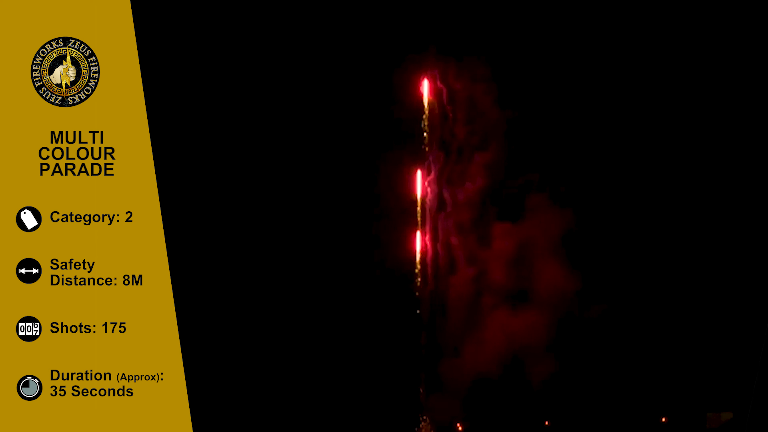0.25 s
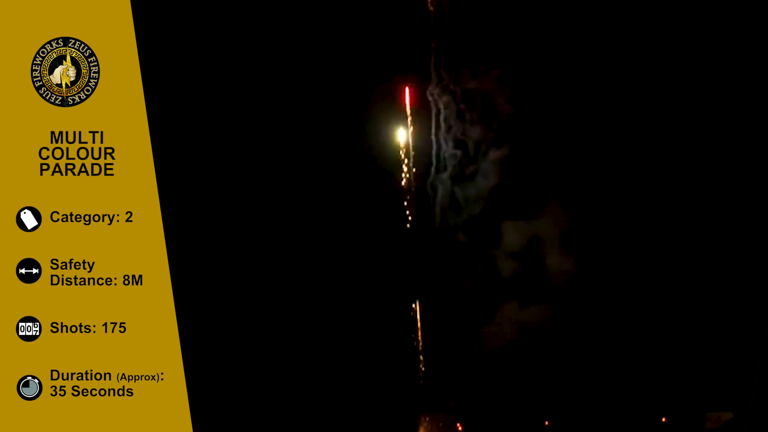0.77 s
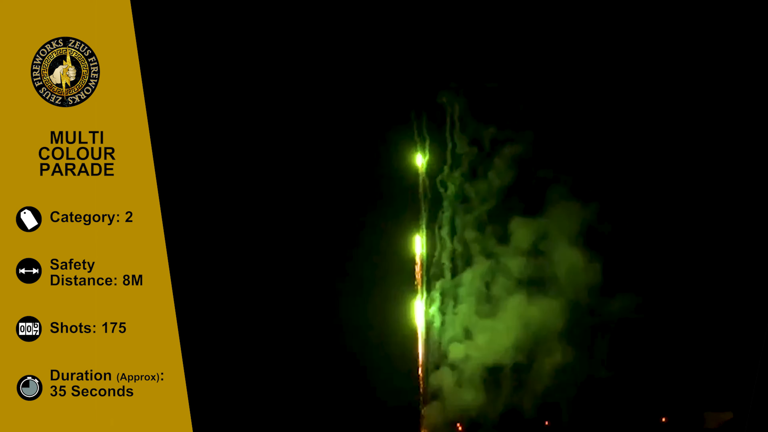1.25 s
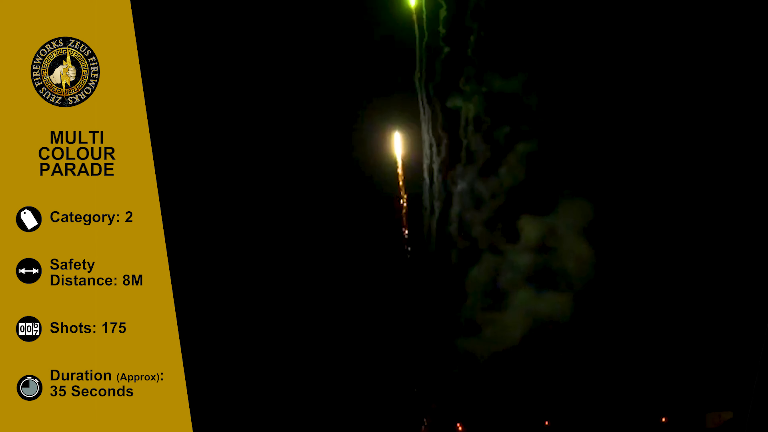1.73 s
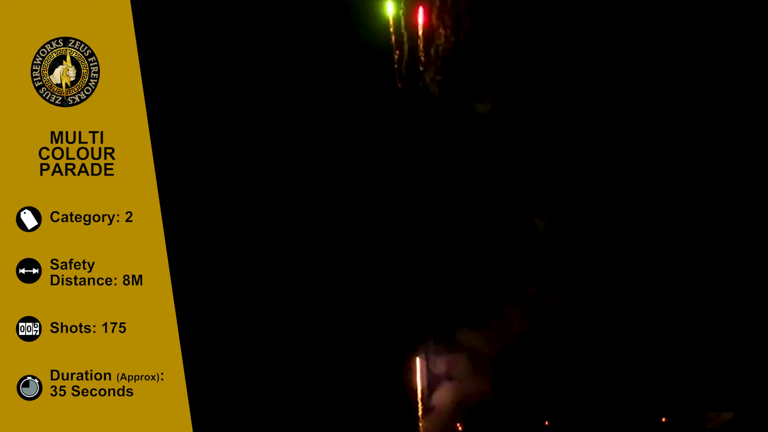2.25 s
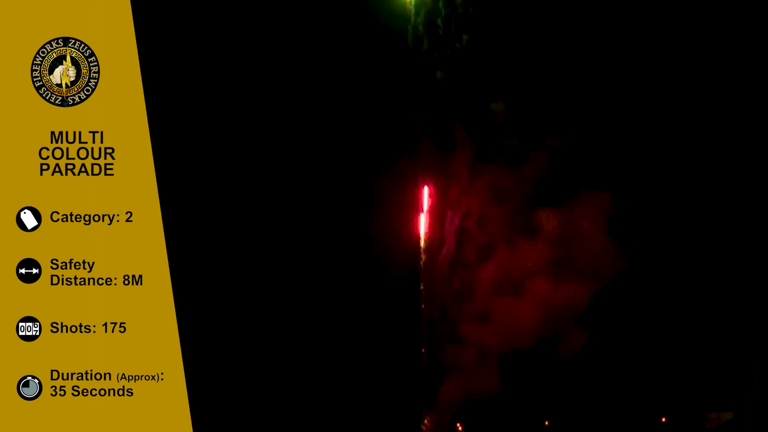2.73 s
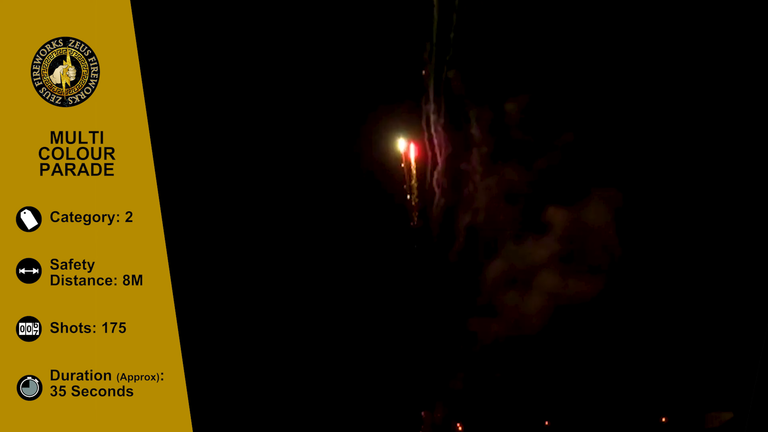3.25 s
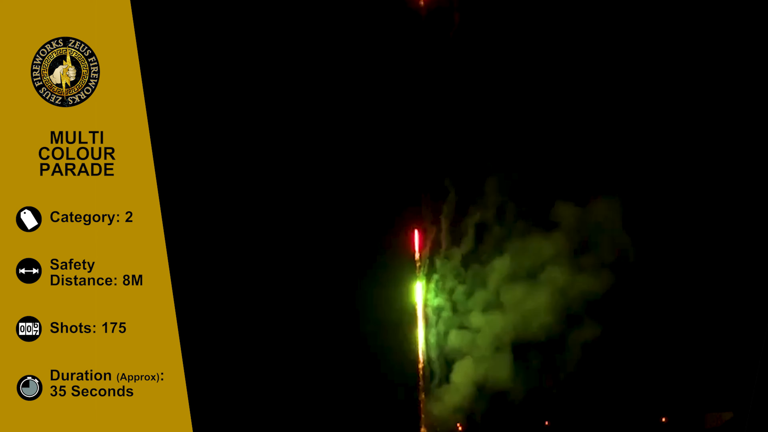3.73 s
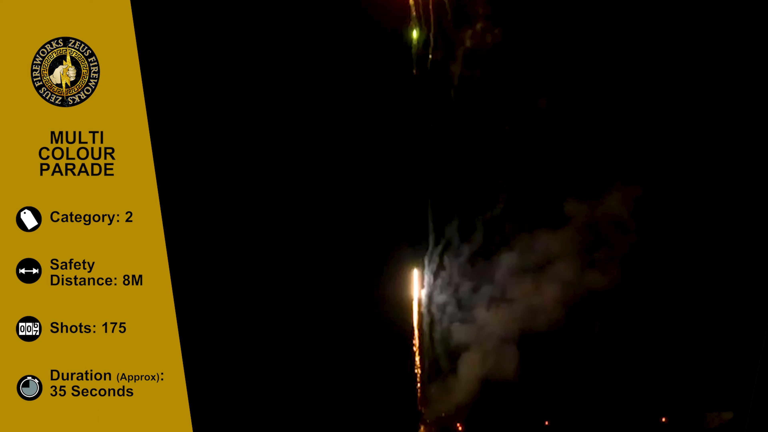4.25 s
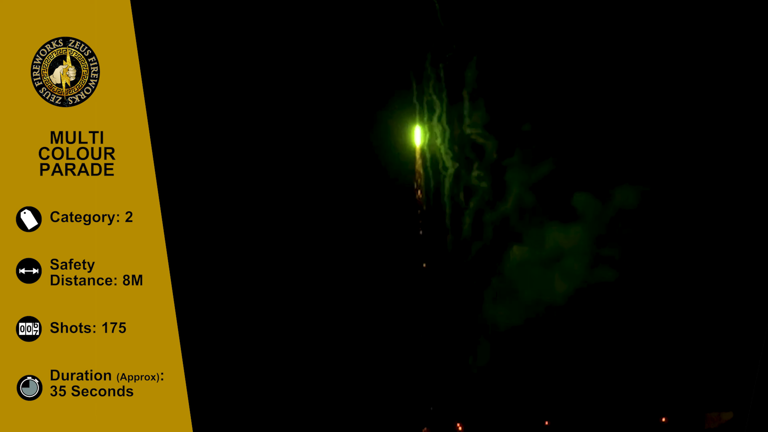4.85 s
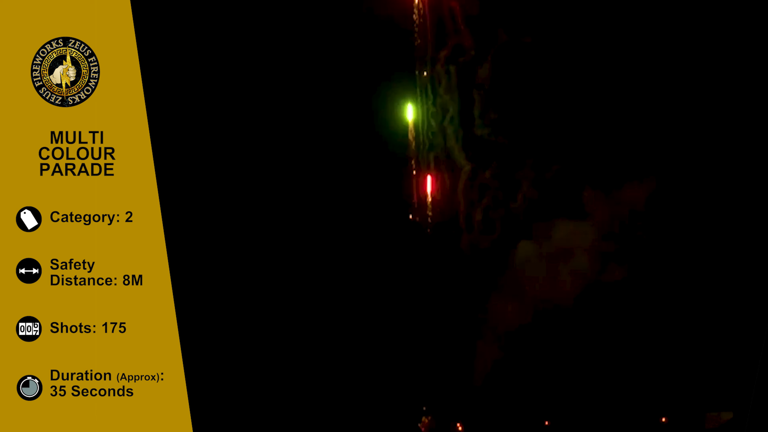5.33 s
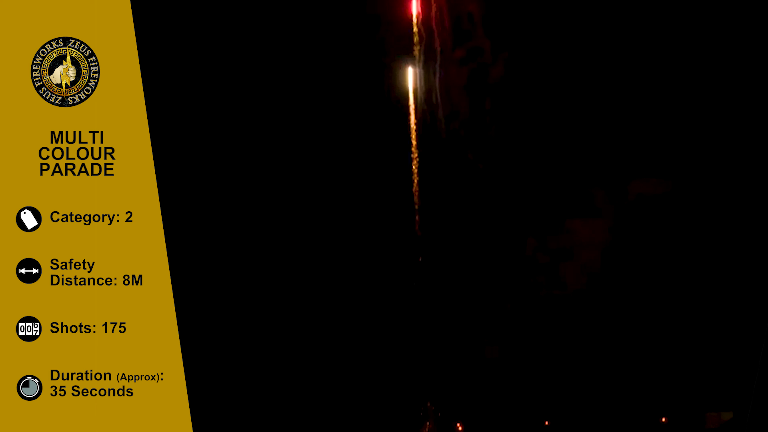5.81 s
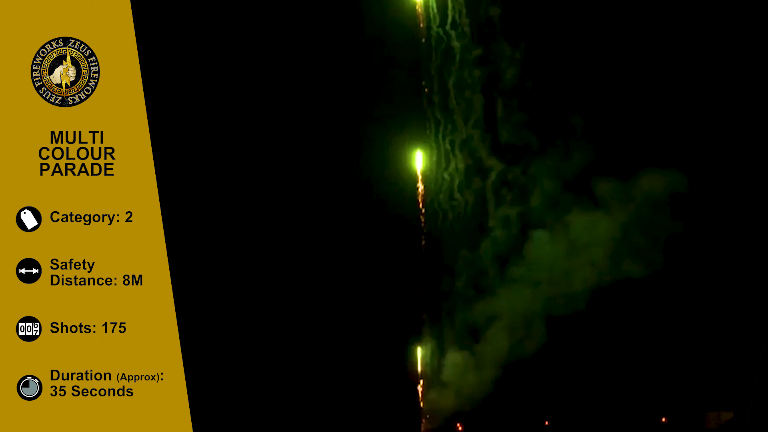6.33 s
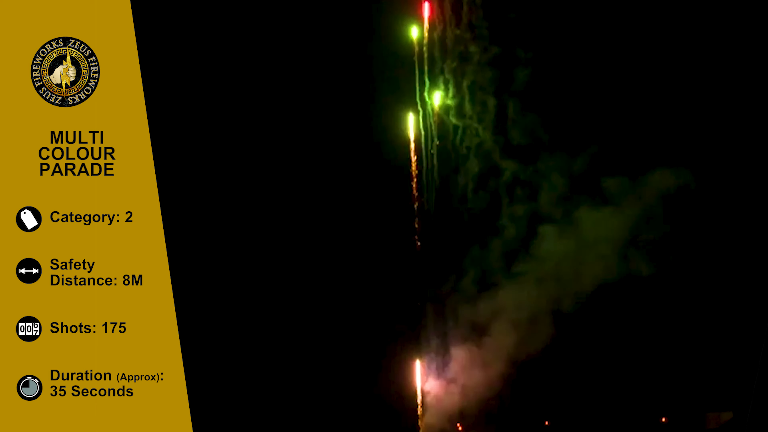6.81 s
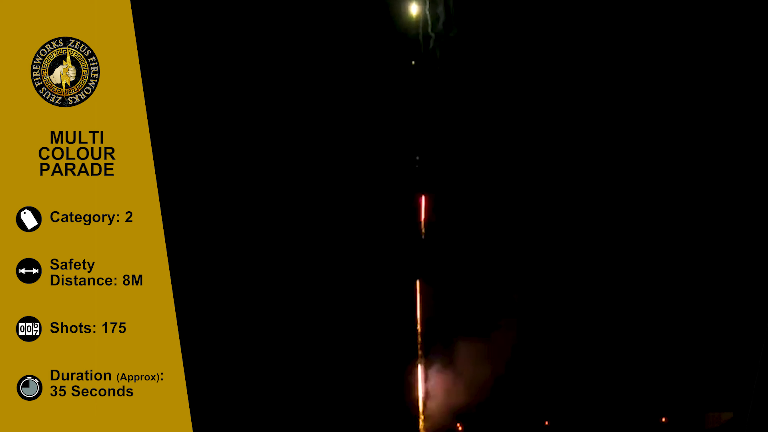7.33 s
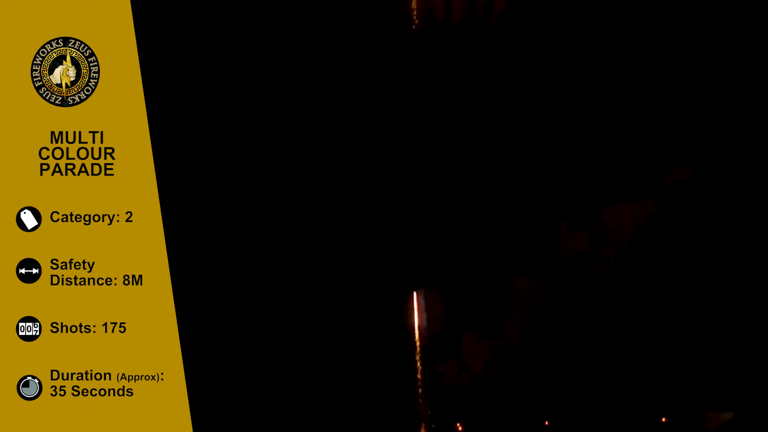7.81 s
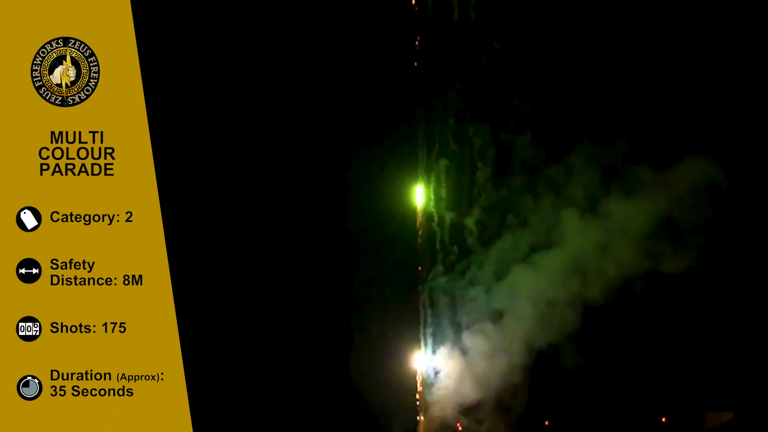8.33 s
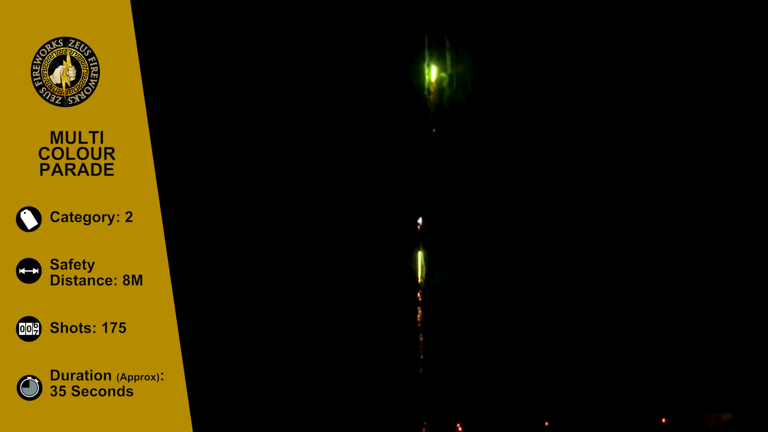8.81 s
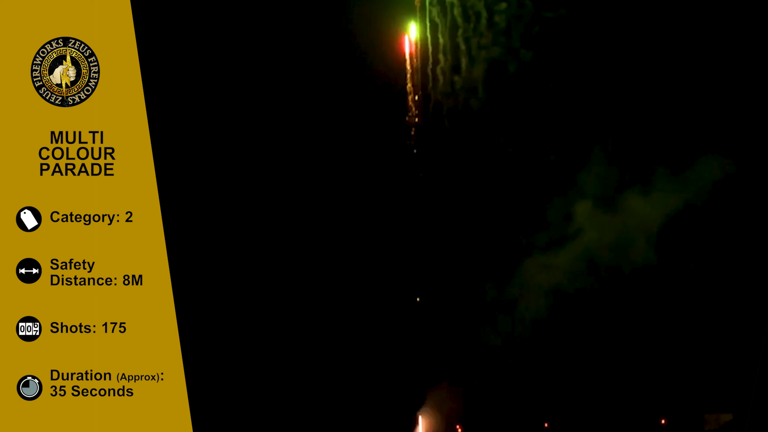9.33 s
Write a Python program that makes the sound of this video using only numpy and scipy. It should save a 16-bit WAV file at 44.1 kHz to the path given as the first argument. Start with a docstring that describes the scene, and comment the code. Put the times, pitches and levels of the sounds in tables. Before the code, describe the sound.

Sharp firework pops and cracks come in quick, irregular clusters some way off, over a faint fizz and low rumble.

```python
"""Outdoors at night, some way off, a bundle of roman candles fires an uneven string of pops.
Each shot is a puff of gas, a hissing jet and a sharp crack as the star (the glowing ball) clears
the tube, which rings briefly. The ground, things nearby and distant trees echo the shots.
In between, the burning tubes fizz over a low rumble of wind and traffic."""
import sys
import numpy as np
from scipy import signal
from scipy.fft import rfft, irfft, next_fast_len
from scipy.io import wavfile
from scipy.ndimage import map_coordinates

SR = 44100
rng = np.random.default_rng(int(sys.argv[2]) if len(sys.argv) > 2 else 0)


def persist_wave(psi):
    """Save psi, clipped to +-1, as 16-bit WAV."""
    counts = np.round(np.clip(psi, -1, 1) * 32767).astype(np.int16)
    wavfile.write(sys.argv[1], SR, np.atleast_2d(counts).T)


N = 421596
LEAD = SR // 10  # spare samples for a shot fired just before the start


def shots(crack_s=0.000088, spit_db=2):
    """A powder charge drives each shot: a bigger one makes every part of the pop louder."""
    # The shots. Crack and kick are on top of what that charge usually gives.
    # start_s, charge_db, crack_db, kick_db
    firings = [(-0.016, 2.5, 4, 7.5), (0.173, -1.5, -10.0, 4), (0.1885, 2.3, 1.5, 4.5), (0.452, -4.5, 2, 8),
               (0.5707, 3.5, 3.5, -2.5), (0.7346, -3, 2, 4), (0.8786, -7.5, -1, -2), (1.1519, -2.3, -3, -7),
               (1.2617, 1.4, -5, 7.5), (1.2952, 1.2, 1, 0.0), (1.6254, 5, 6.0, 5), (1.8981, 1.9, 0.5, 4),
               (1.9964, 0.9, 6.5, 6), (2.3095, 0.5, 4.5, 1.5), (2.504, 2, -4, 1.0), (2.6299, -3, 2, 8.5),
               (2.6636, 0.6, 4.0, 6.5), (2.8711, -4, -1, -17), (2.8905, 5.3, 3, 0), (3.003, -4.5, 7.5, 5.0),
               (3.6631, -0.4, 0.0, 3), (3.688, -1, -4, -7), (3.7385, 0.0, -1, -1), (3.7772, 1.2, 4.5, 2),
               (3.87, -1.6, 4, -2), (4.2537, 4, 3, 4), (4.6992, 0.7, -7, -20), (4.9776, 2.1, 5.5, 3),
               (4.983, 5, -16, 2), (5.102, -1.8, 4.5, -4), (5.1718, 0, -0.5, 3), (5.5033, 5.5, -2.5, 1),
               (5.5291, -3, 6.5, 1), (5.6382, 1.5, 7.5, -1.0), (6.0693, 3, 7, 4.5), (6.16, -4, 3, -1),
               (6.358, -3.0, -5, -20.0), (6.4705, 0.8, -3.0, -12), (6.532, 3.5, 3, -9),
               (6.687, 1.5, 6.5, 3.5), (6.8623, -6, 6.5, 8), (7.262, -1.5, 2, 8.5), (7.366, 2.4, 2, 2),
               (7.4008, -0.5, -5, 0), (7.7674, 0.1, -4, -25), (7.8462, 4.5, 4, -5), (8.006, 4.3, 2, 7.5),
               (8.192, -5, 1, -20), (8.252, -18, -4.0, 14.5), (8.4319, -5.0, 0.5, -6.0),
               (8.797, -2.0, 2, -11), (9.003, -1.7, 7.5, -3), (9.075, 1, 7.5, -19), (9.1323, -0.8, 7.5, 0),
               (9.4392, 5.5, 1, 4), (9.518, -3, 2, 6)]
    # The gas jet's low roar and high hiss: pitch_hz, level_db
    roar_tone = [(40, -4), (90, 13), (250, 13), (450, -19.5), (700, -3), (1100, 3.5), (2000, 9),
                 (3000, 2.5), (4500, -9), (9000, -56)]
    hiss_tone = [(1200, -5), (2500, -4.5), (3800, -2.5), (5500, -1.5), (7500, -7), (10000, -7),
                 (12500, -5.5), (16000, -15)]
    track = np.zeros(N + LEAD)
    t = np.arange(-SR // 50, SR // 16) / SR  # seconds from the crack
    shape = (len(firings), len(t))
    roars, hisses = noise(roar_tone, shape), noise(hiss_tone, shape)
    chance = rng.standard_normal((len(firings), 4))  # no two charges burn alike
    for (start_s, charge_db, crack_db, kick_db), low, high, luck in zip(firings, roars, hisses, chance):
        # Gas leaks slowly past the star, then kicks out behind it.
        leak_stretch, kick_stretch = np.exp(0.047 * luck[:2])
        leak = puff(t / leak_stretch, peak_s=-0.0012, rise_s=0.0022, fall_s=0.0028)
        kick = puff(t / kick_stretch, peak_s=0.00077, rise_s=0.00045, fall_s=0.00062)
        leak_db = -31.5 + 1.12 * charge_db - 0.053 * kick_db  # gas saved for the kick cannot leak
        thump = amp(leak_db) * leak + amp(-33.5 + charge_db + kick_db) * kick
        shock = amp(-17 + charge_db + crack_db) * crack(t, crack_s)
        jet_peak_s = 0.00068 * luck[2] - 0.00037  # usually just before the crack
        roar = amp(-35) * low * jet(t - jet_peak_s / 2, rise_s=0.0043, fall_s=0.0071)
        body = amp(0.73 * charge_db) * (roar + amp(-35.5) * tube_ring(t))
        db_per_octave = 1 + 0.2 * luck[3]  # brightens the hiss
        bright = filtered(high, lambda hz: amp(db_per_octave * np.log2(np.maximum(hz, 2500) / 5000)))
        spits = unit(amp(spit_db * wobble(1551, len(t))))  # the jet spits unevenly
        hiss = amp(-32 + charge_db) * bright * spits * jet(t - jet_peak_s, rise_s=0.0037, fall_s=0.0038)
        add(track, start_s + t[0], thump + shock + body + hiss)
    return track


def crack(t, length_s):
    """As the star clears the tube, the pressure jumps, then dips into a shallow suction."""
    age = np.maximum(t / length_s + 1 / 8, 0)
    return (t >= -1 / SR) * (1 - age / 2) * np.exp(-age)


def puff(t, peak_s, rise_s, fall_s):
    """The flow of gas swells and collapses; we hear how fast it changes."""
    age = (t - peak_s) / np.where(t < peak_s, rise_s, fall_s)
    return -age * np.exp(-age * age / 2) * np.where(t < peak_s, fall_s / rise_s, 1)


def jet(t, rise_s, fall_s):
    """The jet's strength: gas slips past the star ever faster, then the tube empties."""
    return np.exp(-np.maximum(-t / rise_s, 0) ** 2.6 - np.maximum(t / fall_s, 0))


def tube_ring(t, swell_s=0.0037, vary_db=2.0):
    """The air in the emptied tube rings with a short hollow note, a little different each shot."""
    # The tones of that air: pitch_hz, level_db, fade_s (time to drop 60 dB)
    tube_tones = [(189.6, -1.5, 0.038), (468, 2, 0.036), (598, -12.5, 0.077), (710, -15, 0.11),
                  (875, -3.5, 0.058), (1036, -3.5, 0.052), (1146, 2, 0.039), (1250, -3, 0.032),
                  (1460, -37, 0.037), (1969, -8, 0.055), (2076, -22, 0.041)]
    pitch_hz, level_db, fade_s = np.transpose(tube_tones)[:, :, None]
    louder, detune, phase = rng.standard_normal((3, len(tube_tones), 1))
    age = np.maximum(t, 0)
    levels = amp(level_db + vary_db * louder - 60 * age / fade_s)
    waves = np.sin(2 * np.pi * (pitch_hz * (1 + 0.017 * detune) * age + phase))
    return (levels * waves).sum(axis=0) * (1 - np.exp(-age / swell_s))


def near_paths(x, bounce_s=.00019, bounce=0.43, right_lead_s=.0000145, treble_hz=2800):
    """Sound arrives straight, off the ground and off things nearby; treble reaches the right first."""
    # Echoes from things nearby: delay_s, level_db, dull_above_hz
    nearby = [(.0061, -28.5, 1420), (.0069, -31.5, 3000), (.0100, -25, 2200), (0.018, -22, 2600)]
    ground = lambda hz: 1 + bounce * delay(hz, bounce_s)
    echoes = lambda hz: 1 + sum(amp(db) * delay(hz, s) / (1 + 1j * hz / dull) for s, db, dull in nearby)
    sides = lambda hz: delay(hz, np.outer([.5, -.5], right_lead_s * hz ** 2 / (hz ** 2 + treble_hz ** 2)))
    return filtered(x, lambda hz: ground(hz) * echoes(hz) * sides(hz))


def grass(pops):
    """Tufts and bumps scatter short sound waves; much longer ones pass over them."""
    # The rough ground's echo: pitch_hz, level_db, fade_s
    ground_echo = [(60, 15.5, 0.03), (292, -19.5, 0.079), (860, -12.5, 0.0098), (2730, -12.5, 0.088),
                   (6400, -11.5, 0.12), (14000, -13.5, 0.085)]
    short_waves = filtered(pops, lambda hz: hz ** 4 / (hz ** 4 + 170 ** 4))
    return scatter(short_waves, ground_echo, build_s=0.0065, size=SR // 8)


def treeline(count):
    """The jets sound different in each direction, so each group of trees returns its own echo."""
    # The distant trees' echo: pitch_hz, level_db, fade_s
    tree_echo = [(60, -12.5, 0.71), (326, -23.5, 1.2), (686, -10, 2.4), (970, -8.5, 1.5), (1130, -9, 1.04),
                 (1360, -9.5, 1.47), (2000, -13, 1.47), (3500, -10, 0.98), (5900, -12.5, 1.1),
                 (9000, -15, 0.97), (15000, -15, 0.83)]
    echoes = (scatter(shots(), tree_echo, build_s=0.032, size=3 * SR // 2) for _ in range(count))
    return sum(echoes) / np.sqrt(count)


def fizz(level_db=-63.5, flutter_db=2.3, spread=0.76):
    """The powder burns on in the tubes between shots."""
    # The burning powder's hiss: pitch_hz, level_db
    fizz_tone = [(700, -25), (2000, -16), (5000, -5.5), (7500, -6.5), (9500, -6), (12000, -1.5),
                 (16000, -4)]
    sound = unit(noise(fizz_tone, N) + spread * noise(fizz_tone, (2, N)))
    return amp(level_db + flutter_db * wobble(25, N)) * sound


def night(level_db=-53.5, swell_db=2.04):
    """Far-off wind and traffic make a low rumble."""
    # The rumble's tone: pitch_hz, level_db
    rumble_tone = [(15, -28), (30, 7.5), (60, -1.5), (85, -3), (115, -0.5), (160, -4.5), (260, -12.5),
                   (360, -17.5), (600, -14.5), (1000, -19), (2000, -31.5), (5000, -31.5), (16000, -33.5)]
    sound = unit(filtered(diffuse(N), lambda hz: amp(along(rumble_tone, hz))))
    return amp(level_db + swell_db * wobble(5.8, N)) * sound


def scatter(x, table, build_s, size):
    """Many tiny echoes blur and build up, then each pitch fades at its own speed."""
    hz, t, slices = signal.stft(diffuse(size), SR, nperseg=128)
    fade = amp(-60 * t / along(table, hz, column=2)[:, None]) * (1 - np.exp(-t / build_s))
    fade /= np.sqrt(np.mean(fade ** 2, axis=1, keepdims=True) * size)
    tail = signal.istft(slices * fade, SR, nperseg=128)[1]
    tail = filtered(tail, lambda hz: amp(along(table, hz)))
    return signal.fftconvolve(x[None], tail, axes=1)[:, :len(x)]


def diffuse(size):
    """Noise from all around: left and right are alike in the bass, unrelated in the treble."""
    # How alike the two sides are: pitch_hz, likeness (0 to 1)
    alike = [(100, 0.99), (290, 0.72), (640, 0.95), (1400, 0.94), (3100, 0.75), (7000, 0), (15000, 0)]
    angle = lambda hz: np.arccos(np.clip(along(alike, hz), -1, 1)) / 2
    shares = lambda hz: np.array([np.cos(angle(hz)), np.sin(angle(hz))])
    mid, side = filtered(rng.standard_normal((2, size)), shares)
    return np.array([mid + side, mid - side])


def amp(db):
    """Turn decibels into a multiplier."""
    return 10 ** (np.asarray(db) / 20)


def unit(x):
    """Scale to an average (rms) level of 1."""
    return x / np.sqrt(np.mean(x ** 2) + 1e-20)


def along(points, hz, column=1):
    """Read a table's column at any pitch, blending between rows."""
    table = np.transpose(points)
    return np.interp(np.log(hz + 1), np.log(table[0]), table[column])


def wobble(rate, size):
    """A smooth curve through `rate` random points a second."""
    return map_coordinates(rng.standard_normal(int(size * rate / SR) + 4), [np.arange(size) * rate / SR])


def filtered(x, response):
    """Scale and delay each pitch in x as response(hz) says."""
    n = x.shape[-1]
    padded = next_fast_len(n + 8192)
    return irfft(rfft(x, padded) * response(np.fft.rfftfreq(padded, 1 / SR)), padded)[..., :n]


def delay(hz, s):
    """The filter response that makes sound s seconds late."""
    return np.exp(-2j * np.pi * hz * s)


def noise(tone, shape):
    """Noise of level 1, shaped by a tone table."""
    return unit(filtered(rng.standard_normal(shape), lambda hz: amp(along(tone, hz))))


def add(track, s, sound):
    """Mix a sound into a track that starts LEAD samples early."""
    start = max(round(s * SR) + LEAD, 0)
    part = track[start:start + len(sound)]
    part += sound[:len(part)]


def scene():
    """The shots with their echoes, over the fizz and the night."""
    pops = shots()
    fireworks = near_paths(pops) + grass(pops) + treeline(count=3)
    return fireworks[:, LEAD:] + fizz() + night()


def record(dry):
    """The microphones cut the deep bass, which makes each puff rebound, and soften the treble."""
    # The microphones' treble: pitch_hz, level_db
    treble = [(9000, 1), (10800, -4.5), (12800, -10.5), (16000, -14)]
    # Their balance: pitch_hz, left_minus_right_db
    balance = [(130, -0.7), (300, 0.9), (600, 0), (3000, -0.5), (5300, -0.2), (8000, 0.5)]
    cut_hz, top_hz = np.array([[61.6], [58.4]]), 15900  # bass cut (left, right), treble limit
    low_cut = lambda hz: -hz ** 2 / (cut_hz ** 2 - hz ** 2 + 1.05j * hz * cut_hz)
    high_cut = lambda hz: 1 / np.sqrt(1 + (hz / top_hz) ** 160)
    colour = lambda hz: amp(along(treble, hz) + np.outer([.5, -.5], along(balance, hz)))
    return filtered(dry, lambda hz: low_cut(hz) * colour(hz) * high_cut(hz))


dry = scene()
out = record(dry)
persist_wave(out)
```